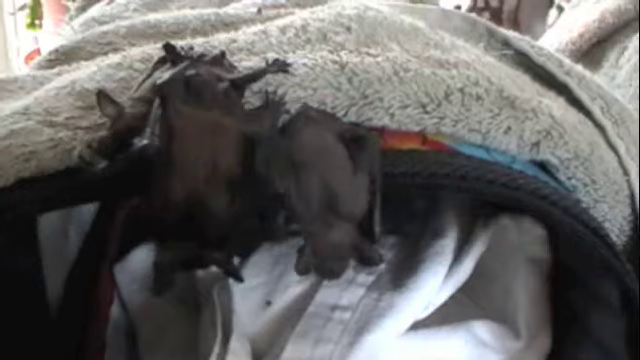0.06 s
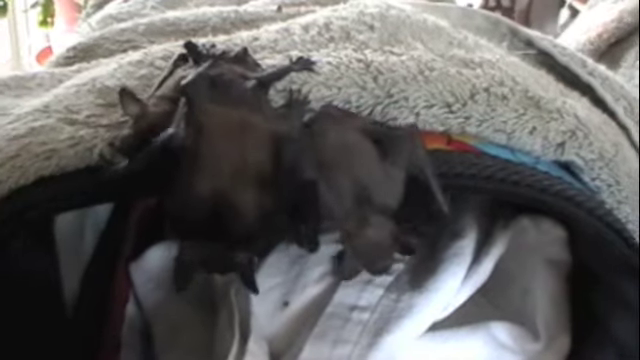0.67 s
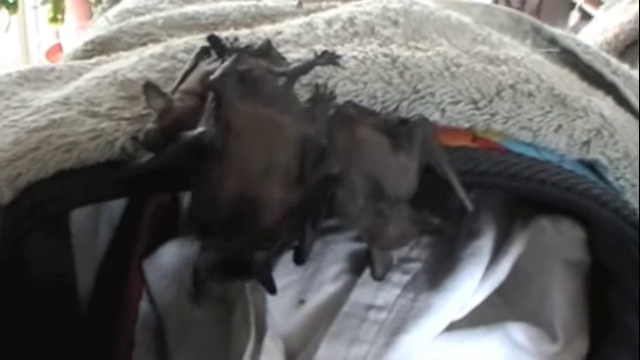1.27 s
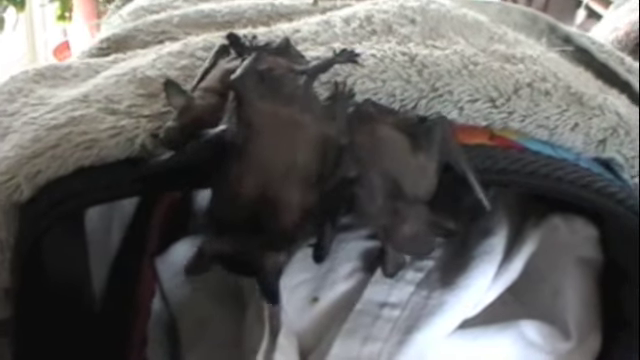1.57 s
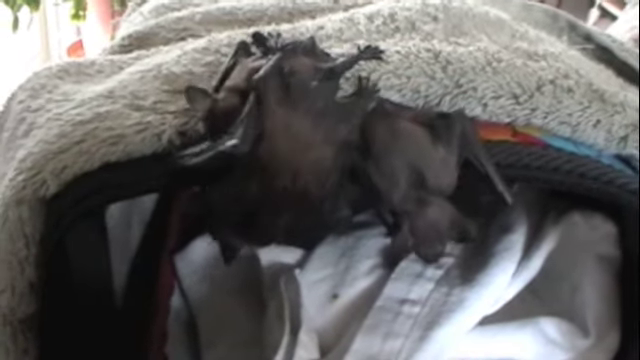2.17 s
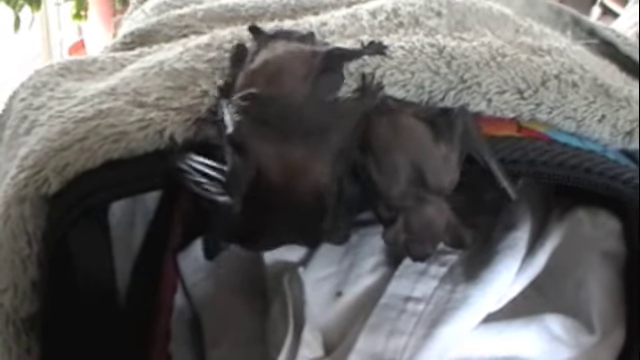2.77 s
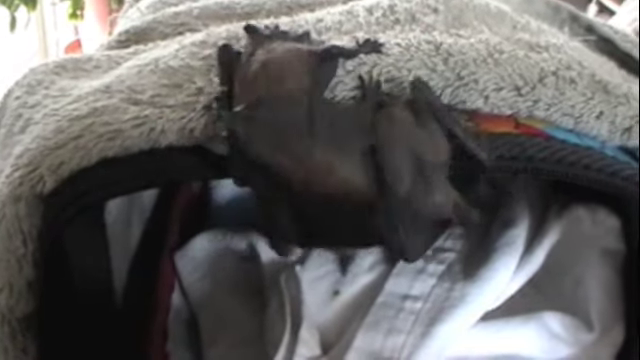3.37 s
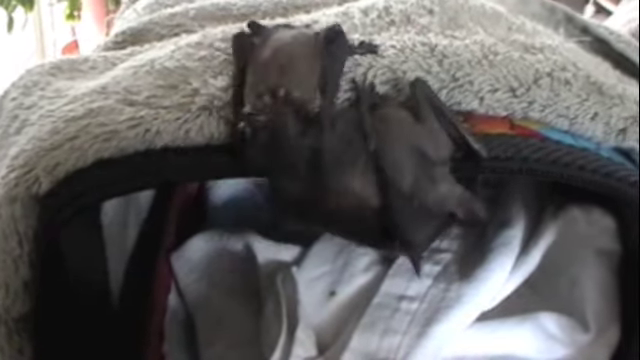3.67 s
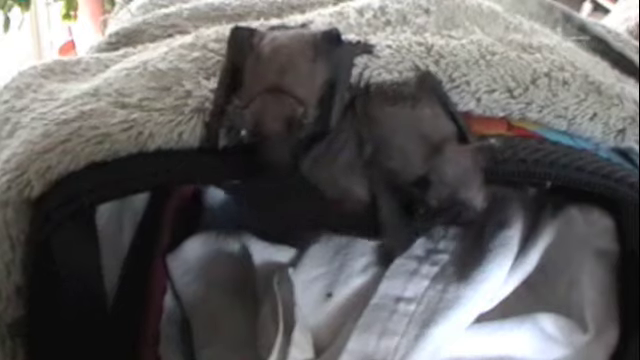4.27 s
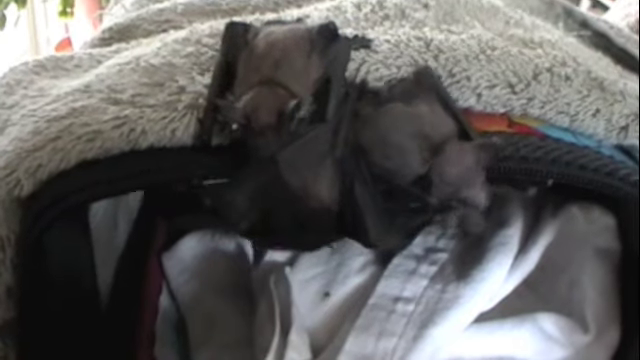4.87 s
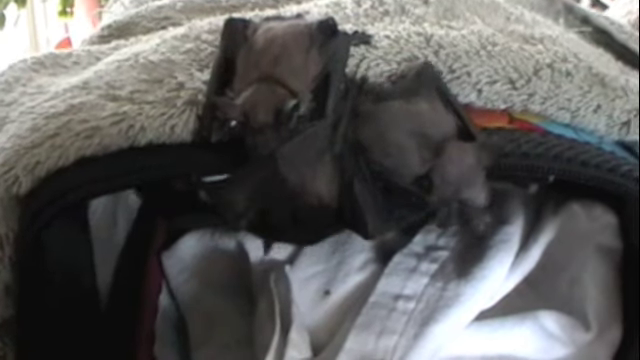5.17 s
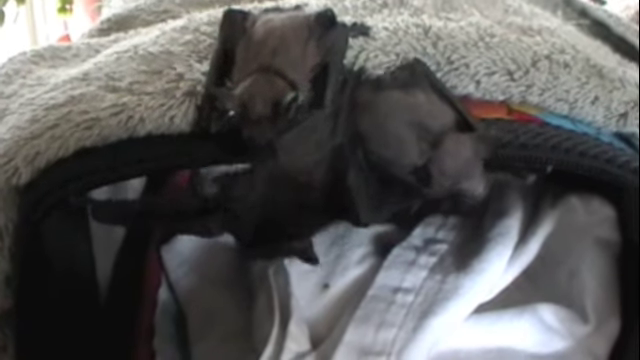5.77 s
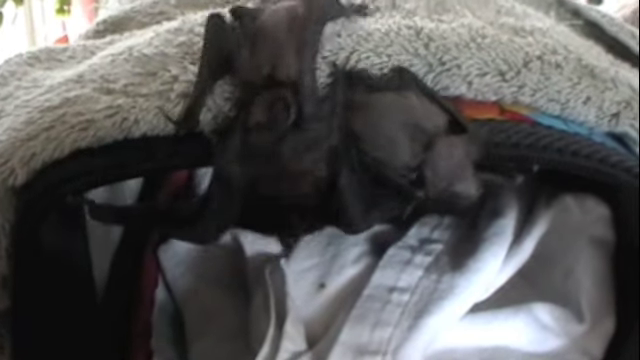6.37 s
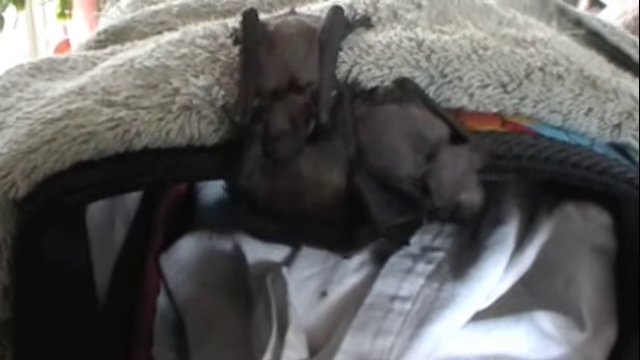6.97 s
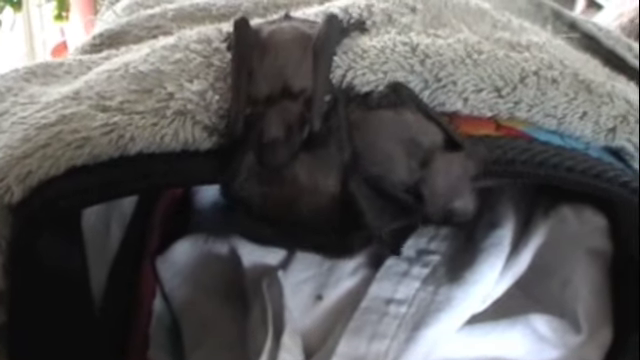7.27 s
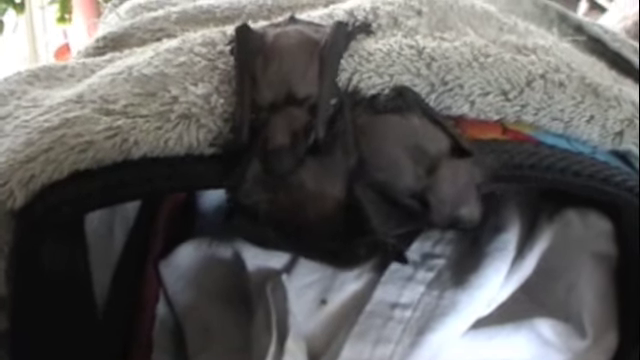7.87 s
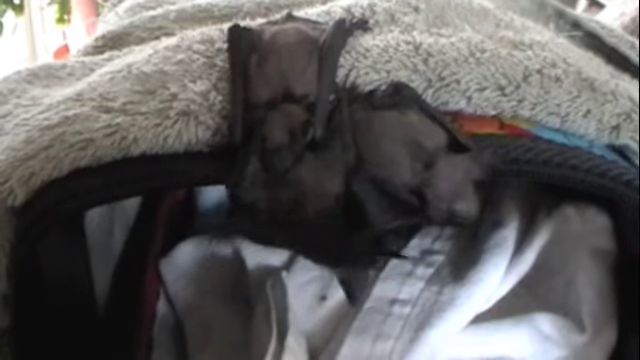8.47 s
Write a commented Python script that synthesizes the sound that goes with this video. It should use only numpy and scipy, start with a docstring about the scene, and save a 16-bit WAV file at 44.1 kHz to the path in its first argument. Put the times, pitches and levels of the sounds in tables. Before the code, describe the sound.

Two bat pups move on a padded basket close to the microphone, over a quiet room's low hum and faint hiss. Light claw scrapes and clicks on fabric open the scene, with a sharper click at 0.7 seconds. From 1.8 to 2.7 seconds comes a run of tiny, extremely high, falling chirps, followed by a few fainter ones. A steadier run, about eight chirps a second, lasts from 4 to 5.7 seconds, while the scratching grows busier, with a sharp snag at 5.1 seconds. The basket bumps softly a few times between 3.2 and 6.5 seconds. The loudest chirps cluster from 6.3 to 6.9 seconds among more claw clicks, and a last faint one follows at 7.2. A faint, rapid mechanical ticking rises from about 5.5 to 8.2 seconds. Light, crisp scratches on cloth return from 8.1 seconds until the end at about 8.7.

```python
"""Bat pups on a padded basket

Two pups, close to a small camera in a quiet room, give short falling chirps near 15 kHz.
Their claws scrape and snag in the fabric (noise grains and snaps through four cloth registers),
and the basket bumps softly. The room hums; a faint regular ticking, probably the lens drive,
rings the camera's housing."""
import sys
import numpy as np
from scipy import signal
from scipy.fft import rfft, irfft, next_fast_len
from scipy.io import wavfile
from scipy.ndimage import uniform_filter1d, map_coordinates

SR = 44100
rng = np.random.default_rng(int(sys.argv[2]) if len(sys.argv) > 2 else 0)


def to_wav(sig):
    """Store sig (one row per channel, or 1-D mono) as 16-bit WAV at the path in sys.argv[1].

    Samples outside -1..1 are clipped; the rate is SR.
    """
    pcm = np.clip(np.atleast_2d(sig), -1, 1) * 32767
    pcm = np.round(pcm).astype(np.int16)
    wavfile.write(sys.argv[1], SR, pcm.T)  # frames by channels


N = 384552

# restless shuffling of the bodies: (time [s], level [dB])
SHUFFLE_LEVEL = [(0, -73), (1.4, -78), (2.6, -70.5), (3.8, -61), (5.5, -65), (6.7, -60), (7.6, -70),
                 (8.3, -66), (8.72, -74)]


def amp(db):
    """Decibels to gain."""
    return 10 ** (np.asarray(db) / 20)


def unit(x):
    """Scale to rms 1."""
    return x / np.sqrt(np.mean(x ** 2) + 1e-20)


def along(points, hz):
    """Interpolate (frequency [Hz], value) rows on a log axis."""
    knots_hz, values = np.transpose(points)
    return np.interp(np.log(hz + 1), np.log(knots_hz + 1), values)


def curve(rows):
    """One value per sample from (time [s], value) rows."""
    return np.interp(np.arange(N) / SR, *np.transpose(rows))


def wobble(knots_per_s):
    """Smooth random curve."""
    knots = rng.standard_normal(int(N * knots_per_s / SR) + 4)
    return map_coordinates(knots, [np.arange(N) * knots_per_s / SR])


def filtered(x, response):
    """Apply the frequency response response(hz)."""
    size = next_fast_len(N + SR // 2)
    return irfft(rfft(x, size) * response(np.fft.rfftfreq(size, 1 / SR)), size)[..., :N]


def ring(x, spectrum, size=2048):
    """Minimum-phase colouring that keeps the power of white noise."""
    cepstrum = irfft(np.log(amp(along(spectrum, np.fft.rfftfreq(size, 1 / SR)))))
    cepstrum[1:size // 2] *= 2
    cepstrum[size // 2 + 1:] = 0
    impulse = irfft(np.exp(rfft(cepstrum)))
    return signal.fftconvolve(x, impulse / np.linalg.norm(impulse))[:N]


def add(track, start_s, sound):
    """Mix a sound into a track in place."""
    part = track[max(round(start_s * SR), 0):][:len(sound)]
    part += sound[:len(part)]


def reflections(x, near_t60_s, near_db, far_t60_s, far_db, gap_s):
    """Quick stereo scatter off basket and camera, plus the room's faint tail."""
    t = np.arange(SR // 3) / SR
    decay = lambda t60_s: amp(-60 * t / t60_s) / np.linalg.norm(amp(-60 * t / t60_s))
    envelope = amp(near_db) * decay(near_t60_s) + amp(far_db) * decay(far_t60_s)
    noise = unit(rng.standard_normal(len(t)) + 0.65 * rng.standard_normal((2, len(t))))
    impulse = np.pad(envelope * noise, ((0, 0), (round(gap_s * SR), 0)))
    return signal.fftconvolve(x[None], impulse, axes=1)[:, :N]


def air(spectrum):
    """Stereo noise of rms 1, nearly mono in the bass."""
    # left-right likeness: (frequency [Hz], correlation [1])
    coherence = [(60, 0.95), (125, 0.9), (250, 0.854), (500, 0.56), (1000, 0.091), (2000, 0.057),
                 (4000, 0.32), (8000, 0.48), (12000, 0.93)]

    def mid_side_gains(hz):
        angle = np.arccos(np.clip(along(coherence, hz), -1, 1)) / 2
        return amp(along(spectrum, hz)) * [np.cos(angle), np.sin(angle)]

    mid, side = filtered(rng.standard_normal((2, N)), mid_side_gains)
    return unit(np.array([mid + side, mid - side]))


def background(hum_hz=133, hum_half_width_hz=7):
    """Room rumble, a wavering narrow-band hum and camera hiss."""
    # room rumble: (frequency [Hz], relative density [dB])
    rumble_spectrum = [(20, -49.5), (31, -29), (41, -16.5), (56, -2), (70, -7.5), (88, 0), (108, -6.5),
                       (140, 2), (195, -5), (300, -6.5), (400, -8.5), (530, -15), (730, -13.5),
                       (800, -23.5), (950, -21), (1300, -33.5), (2000, -67)]
    # camera hiss, thin whine near 4 kHz: (frequency [Hz], relative density [dB])
    hiss_spectrum = [(700, -33), (1200, 0), (1500, 2), (2100, -2), (2700, -1), (3550, -3.5), (3950, 3.5),
                     (4300, -1), (4900, -4.5), (5600, -7.5), (6500, -12), (8000, -11.5), (10000, -16),
                     (15500, -18), (16200, -38.5)]
    hum_band = lambda hz: 1 / (1 + ((hz - hum_hz) / hum_half_width_hz) ** 2)
    hum = unit(filtered(rng.standard_normal(N), hum_band))
    room_tone = amp(-54.5) * air(rumble_spectrum) + amp(-65) * hum
    hiss = amp(-66) * air(hiss_spectrum)
    return room_tone * amp([[2.1], [-2.5]]) + hiss * amp([[.4], [-.4]])


def lens_drive(step_hz=60, first_s=.019, weak_gain=.55, whirr_gain=.017, scatter=.22, cutoff_hz=5200):
    """Alternating strong and weak ticks ring the camera's housing, which damps the treble."""
    # drive loudness: (time [s], level [dB])
    drive_level = [(0, -74), (2.5, -75), (5.2, -76.5), (5.5, -63.5), (7, -64.5), (8.1, -63), (8.3, -71),
                   (8.72, -76.5)]
    # housing resonances: (centre [Hz], width [Hz], gain [dB])
    modes = [(937, 220, -2.5), (1370, 120, -13), (3296, 90, -1.5), (3485, 100, 3.5), (3913, 110, 5.5),
             (4050, 130, 0.5), (3800, 570, -23)]

    def housing(hz):
        resonance = sum(amp(db) * 1j * hz * width / (centre ** 2 - hz ** 2 + 1j * hz * width)
                        for centre, width, db in modes)
        return resonance / (1 + (hz / cutoff_hz) ** 8)

    ticks = np.round(np.arange(first_s, N / SR - .001, 1 / step_hz) * SR).astype(int)
    strength = np.where(np.arange(len(ticks)) % 2, weak_gain, 1)
    drive = whirr_gain * rng.standard_normal(N)
    drive[ticks] += strength * (1 + scatter * rng.standard_normal(len(ticks)))
    return amp(curve(drive_level)) * unit(filtered(drive, housing))


def basket_bumps(attack_s=.00029):
    """The padded basket answers each nudge with one damped note."""
    # nudges: (time [s], level [dB], pitch [Hz], t60 [s])
    nudges = [(3.246, -39, 198, 0.065), (3.55, -47.5, 584, 0.04), (4.798, -41.5, 246, .05),
              (5.136, -42.5, 270, 0.047), (6.526, -34, 358, 0.028)]
    out, t = np.zeros(N), np.arange(SR // 5) / SR
    for start_s, db, hz, t60_s in nudges:
        envelope = amp(db - 60 * t / t60_s) * (1 - np.exp(-t / attack_s))
        add(out, start_s, envelope * np.sin(2 * np.pi * hz * t))
    return out


def register_gains(db, bright_db, click=False):
    """Gains of the four cloth registers: bright contacts trade rasp for fizz, heavy ones ring hollow."""
    # rows rasp, hollow, scratch, fizz:
    # (scrape share [dB], click share [dB], brightness slope [dB/dB], force slope [dB/dB])
    shares = [(-11.5, -13.5, -0.98, -.26), (-6.5, -9.5, -0.8, .3), (-3, -7, 0.1, -0.03),
              (-12, -17.5, .95, -0.08)]
    scrape_db, click_db, bright_slope, force_slope = np.transpose(shares)
    share_db, usual_db = (click_db, -33.5) if click else (scrape_db, -54)
    return amp(db + share_db + bright_slope * bright_db + force_slope * (db - usual_db))


def claw_scrapes(grain_db=2.5, catch_db=2, edge_s=.0049, sway_db=4, jitter_db=4):
    """Fibres slip past a claw in uneven grains, over faint shuffling; returns four register drives."""
    # claws dragged over cloth: (time [s], length [s], level [dB], brightness [dB])
    strokes = [(0.239, 0.014, -58, -4), (.305, .08, -66, -6), (0.556, 0.039, -58, -1.5),
               (2.38, 0.078, -57, -0.5), (2.998, 0.032, -56, 0.5), (3.692, 0.049, -56, 3.5),
               (3.758, 0.012, -50.5, 4.5), (3.89, .05, -62, -4), (3.97, 0.039, -59, -5),
               (4.117, .027, -56.5, -4), (4.264, 0.047, -55.5, -1.5), (4.793, 0.051, -44.5, 1),
               (4.856, 0.03, -51, 2.5), (4.888, 0.011, -39.5, 0.5), (4.922, 0.038, -50, 0),
               (4.984, 0.01, -44.5, 3), (5.005, 0.034, -43.5, 4), (5.129, 0.11, -52, 0.5),
               (5.163, 0.021, -40.5, -0.5), (5.275, 0.035, -39.5, 2), (5.302, 0.036, -51, 0),
               (5.379, 0.021, -51.5, -4.5), (5.411, .0093, -44.5, 0), (5.865, .03, -60, -5),
               (6.649, .048, -48, 5), (6.811, 0.045, -59, 5), (6.889, 0.039, -54, 6.5),
               (6.996, 0.043, -59.5, 7), (8.121, 0.019, -51.5, 3.5), (8.15, 0.04, -47, 6),
               (8.215, 0.064, -51, 4.5), (8.336, 0.043, -50, 3.5), (8.409, 0.031, -52.5, 6.5),
               (8.449, .017, -49, 8), (8.503, .026, -51.5, 7), (8.536, 0.044, -54.5, 4.5),
               (8.689, 0.031, -52, 9)]
    shuffle = amp(curve(SHUFFLE_LEVEL) + sway_db * wobble(20) + jitter_db * wobble(260))
    shuffle_shares_db = (-15, -11, -9, -19)
    power = np.outer(amp(shuffle_shares_db), shuffle) ** 2
    for start_s, length_s, db, bright_db in strokes:
        t = np.arange(-2 * edge_s, length_s + 4 * edge_s, 1 / SR)
        envelope = (1 + np.tanh(2 * t / edge_s)) * (1 - np.tanh((t - length_s) / edge_s)) / 4
        for track, gain in zip(power, register_gains(db, bright_db)):
            add(track, start_s - 2 * edge_s, (gain * envelope) ** 2)
    grip = unit(amp(grain_db * wobble(1100) + catch_db * wobble(250)))
    return np.sqrt(power) * grip * rng.standard_normal(power.shape)


def snags(rate_per_s=11, over_shuffle_db=18, spread_db=1, bright_spread_db=7.5):
    """Faint random clicks that follow the shuffling: (time [s], level [dB], brightness [dB])."""
    draws = rng.random((round(rate_per_s * N / SR), 3))
    times_s = draws[:, 0] * N / SR
    size, colour = 2 * draws[:, 1:].T - 1
    db = np.interp(times_s, *np.transpose(SHUFFLE_LEVEL)) + over_shuffle_db + spread_db * size
    return list(zip(times_s, db, bright_spread_db * colour))


def claw_clicks(snap_db=6, crackle_db=-4, crackle_t60_s=.0066, settle_db=-21, settle_t60_s=.043,
                release_s=.0008):
    """A claw lets go: a snap, a brief crackle, the cloth settling; returns four register drives."""
    # sharp clicks of claws and mouths: (time [s], level [dB], brightness [dB])
    sharp_clicks = [(.3152, -36.5, 0), (.7422, -23, 0.5), (1.2151, -40, 1), (1.4202, -46.5, 2),
                    (1.7569, -43, 1), (2.8194, -43.5, 2), (3.4501, -47, 15), (3.7594, -34.5, 6),
                    (3.9968, -34.5, 2), (4.0382, -33, 1), (4.0831, -35, -3.5), (4.2073, -40, -10.5),
                    (4.3345, -36.5, -0.5), (4.4223, -45.5, -14.5), (4.7965, -23, -8), (4.9217, -38, -4),
                    (4.9756, -33, 4), (5.1342, -12, -3.5), (5.1414, -26, -5), (5.2485, -36, -5.5),
                    (5.3782, -32, 2), (5.7758, -35.5, -2), (5.8371, -35.5, -0.5), (6.1963, -37.5, -3),
                    (6.334, -32, 6), (6.4203, -24, 10), (6.5246, -28, 2), (6.6263, -26, 1),
                    (6.9192, -30, 5), (6.9805, -37, 0), (6.9935, -35, 3), (8.3355, -34, 0),
                    (8.6712, -37, 9)]
    drives, t = np.zeros((4, N)), np.arange(SR // 16) / SR
    tail = amp(crackle_db - 60 * t / crackle_t60_s) + amp(settle_db - 60 * t / settle_t60_s)
    for start_s, db, bright_db in list(sharp_clicks) + snags():
        click = amp(snap_db) * (t == 0) + tail * rng.standard_normal(len(t))
        for track, gain in zip(drives, register_gains(db, bright_db, click=True)):
            add(track, start_s + release_s, gain * click)
    return drives


def cloth(spot_db=3):
    """Scrapes and clicks ring four registers; each spot of cloth lends a scrape passing resonances."""
    # registers of claw on cloth, low to high: (frequency [Hz], relative density [dB])
    rasp = [(300, -21.5), (1120, -21.5), (1450, -2), (1850, 3), (2200, 1.5), (2500, -0.5), (3000, -6.5),
            (4500, -52)]
    hollow = [(2100, -40), (2600, -42), (2900, -8.5), (3350, -2.5), (3700, 2.5), (4200, -7), (5500, -53.5)]
    scratch = [(2500, -36.5), (3400, -26), (3950, -2.5), (4400, 3), (4950, 3.5), (5600, -5), (6200, -7.5),
               (7000, -13.5), (11000, -41.5)]
    fizz = [(4500, -33.5), (6800, 0), (8200, 3), (9800, 0.5), (11200, -3.5), (13000, -11.5), (15200, -11.5),
            (16500, -23)]

    def ring_registers(drives):
        return sum(map(ring, drives, (rasp, hollow, scratch, fizz)))

    scrape_stft = signal.stft(ring_registers(claw_scrapes()), nperseg=256)[2]
    spots = uniform_filter1d(rng.standard_normal(scrape_stft.shape), size=3, axis=0)  # over frequency
    spots = unit(uniform_filter1d(spots, size=14, axis=1))  # over time
    scrapes = signal.istft(scrape_stft * unit(amp(spot_db * spots)), nperseg=256)[1][:N]
    return scrapes + ring_registers(claw_clicks())


def microphone_ports(claws, lag_s=22e-6):
    """The scratching reaches the left port just after the right, with a different colour."""
    # channel balance: (frequency [Hz], left minus right [dB])
    balance = [(1500, 6.5), (4500, 1), (6000, 3), (8000, -2.5), (12000, -4.5)]
    halves = np.array([[.5], [-.5]])
    response = lambda hz: amp(along(balance, hz) * halves) * np.exp(-2j * np.pi * hz * lag_s * halves)
    return filtered(claws, response)


def mouth_ticks(calls, ahead_s=.02, relative_db=-36, t60_s=.0033):
    """The mouth opens with a tiny bright tick shortly before each call."""
    # tick colour: (frequency [Hz], relative density [dB])
    spectrum = [(5000, -35), (9000, -7), (14000, -1), (16500, -11)]
    out, t = np.zeros(N), np.arange(SR // 200) / SR
    for peak_s, db, *_ in calls:
        add(out, peak_s - ahead_s, amp(db + relative_db - 60 * t / t60_s) * rng.standard_normal(len(t)))
    return ring(out, spectrum)


def pup_calls(top_hz=15680, glide_to_hz=11460, glide_s=.022, flutter_db=2.5):
    """After a mouth tick a whistle swells, slides down and stops; long loud ones end in a plunge."""
    # one whistle each: (peak time [s], level [dB], length after peak [s], pitch at peak [Hz])
    calls = [ (1.761, -47, .002, 15200), (1.8623, -24.5, 0.0049, 14800), (1.9653, -23.5, 0.0053, 15200),
             (2.1314, -22, 0.0026, 15500), (2.341, -27.5, 0.0043, 14800), (2.5233, -33.5, .0025, 15500),
             (2.656, -21, .006, 14700), (2.824, -44.5, 0.0018, 15100), (3.1711, -52, .002, 15400),
             (3.3454, -44, .002, 15350), (3.527, -48, .002, 15500), (3.7119, -42, .007, 15250),
             (3.9849, -41, .002, 15300), (4.073, -27.5, 0.011, 15340), (4.1749, -20, .005, 15200),
             (4.291, -25, 0.016, 15400), (4.406, -28.5, 0.012, 15600), (4.53, -26.5, 0.013, 15200),
             (4.6553, -25, 0.0095, 15200), (4.668, -38, 0.03, 13000), (4.801, -26, 0.024, 15600),
             (4.94, -25.5, .022, 15250), (5.091, -22, 0.015, 15600), (5.2498, -23, 0.0078, 15500),
             (5.4177, -28, .002, 15500), (5.6074, -27, .002, 15450), (5.7431, -40.5, 0.018, 13200),
             (6.243, -33, 0.0018, 15300), (6.324, -18, .002, 15660), (6.3401, -14, .0087, 14900),
             (6.413, -15, 0.005, 15500), (6.4285, -7, .0075, 15270), (6.5295, -11, 0.019, 15720),
             (6.6441, -35, .002, 15500), (6.6933, -14, .013, 15600), (6.7589, -30.5, .0037, 15300),
             (6.9245, -17.5, .019, 15750), (7.2118, -41, .002, 15500)]
    lead_s, rise_s, rise_db, stop_s = .008, .002, 9, .00089
    plunge_hz, plunge_s, plunge_loss_db = 2900, .0017, 19.5
    out, flutter = np.zeros(N), wobble(800)
    for peak_s, db, length_s, peak_hz in calls:
        t = np.arange(-lead_s, length_s + lead_s / 2, 1 / SR)
        to_peak, past_peak, past_end = np.maximum(-t, 0), np.maximum(t, 0), np.maximum(t - length_s, 0)
        loud_and_long = db > -16.5 and length_s > .007
        plunge = loud_and_long * np.exp(np.minimum((t - length_s) / plunge_s, .5))
        onset_hz = (top_hz - peak_hz) * np.tanh(to_peak / rise_s)
        glide_hz = (peak_hz - glide_to_hz) * (1 - np.exp(-past_peak / glide_s))
        hz = peak_hz + onset_hz - glide_hz - plunge_hz * plunge
        # long calls fade further, loud ones hold on
        fade_db = 19 * (length_s / .01) ** .56 * (.65 if db > -18.5 else 1)
        level_db = db - rise_db * (to_peak / rise_s) ** 1.05
        level_db -= fade_db * (past_peak / length_s) ** 1.25
        level_db -= 9 * (past_end / stop_s) ** 2 + plunge_loss_db * plunge
        level_db += flutter_db * flutter[round(peak_s * SR):][:len(t)]
        add(out, peak_s - lead_s, 2 ** .5 * amp(level_db) * np.sin(2 * np.pi * np.cumsum(hz) / SR))
    return out + mouth_ticks(calls)


def scene():
    """Calls and claws close by, in a quiet room; stereo."""
    calls, claws = pup_calls(), cloth()
    calls = calls + reflections(calls, near_t60_s=.0293, near_db=-22.5,
                                far_t60_s=.21, far_db=-24, gap_s=.0026)
    claws = claws + reflections(claws, near_t60_s=.023, near_db=-17,
                                far_t60_s=.3, far_db=-18.5, gap_s=.002)
    basket_and_lens = (basket_bumps() + lens_drive()) * amp([[1], [-1]])
    return calls * amp([[-.7], [.7]]) + microphone_ports(claws) + basket_and_lens + background()


def record(dry):
    """The camera's steep band limit."""
    cutoff_hz = 16800
    return filtered(dry, lambda hz: 1 / (1 + (hz / cutoff_hz) ** 160))


dry = scene()
out = record(dry)
to_wav(out)
```